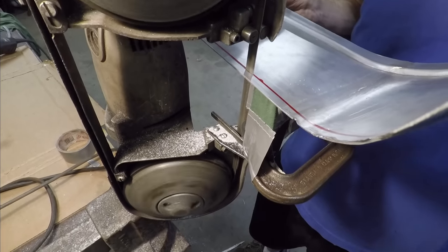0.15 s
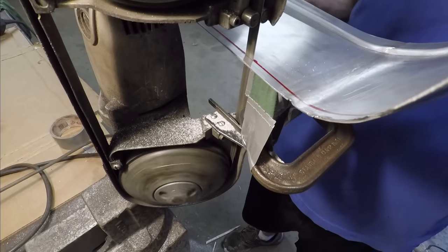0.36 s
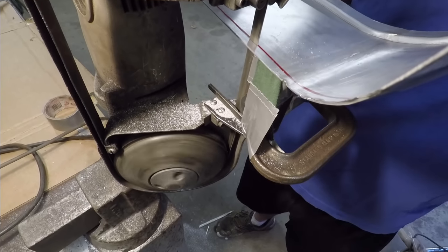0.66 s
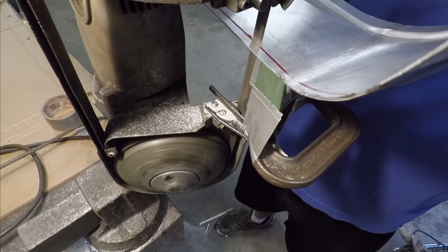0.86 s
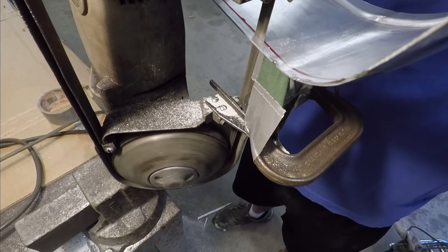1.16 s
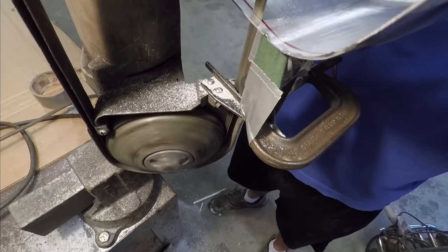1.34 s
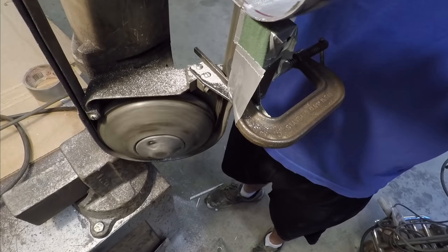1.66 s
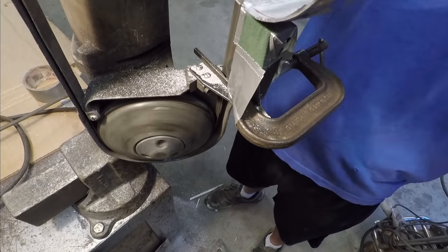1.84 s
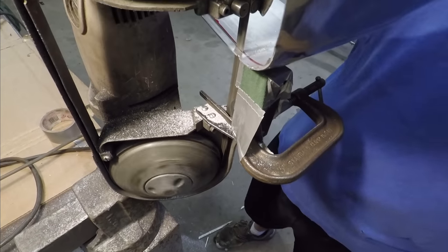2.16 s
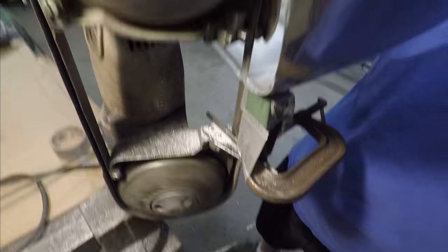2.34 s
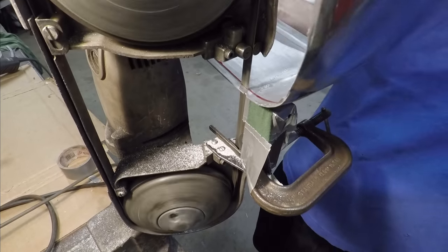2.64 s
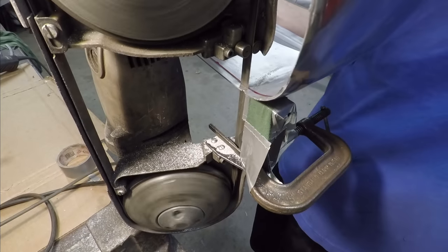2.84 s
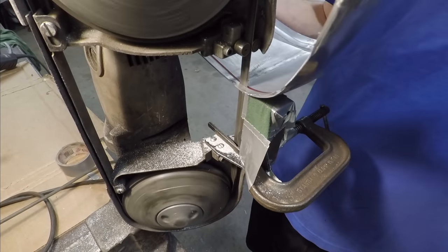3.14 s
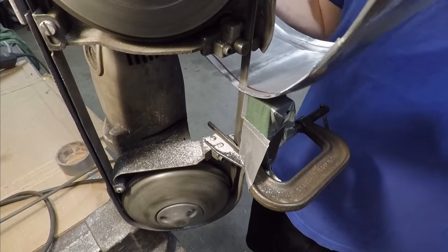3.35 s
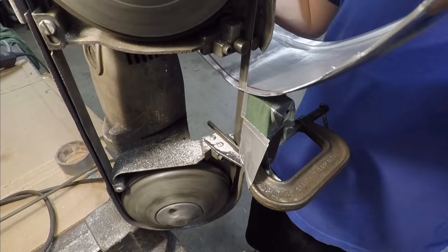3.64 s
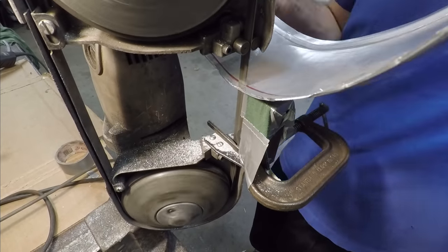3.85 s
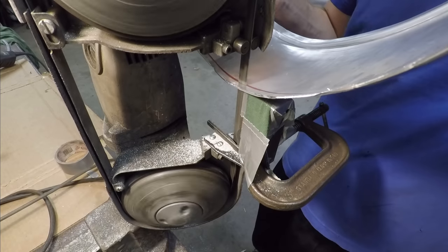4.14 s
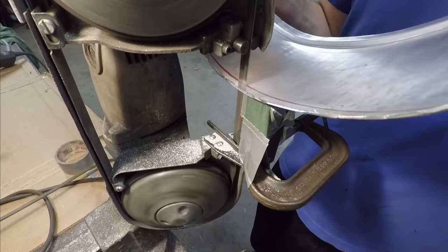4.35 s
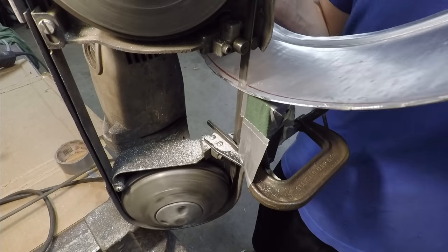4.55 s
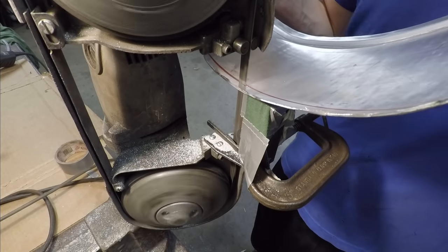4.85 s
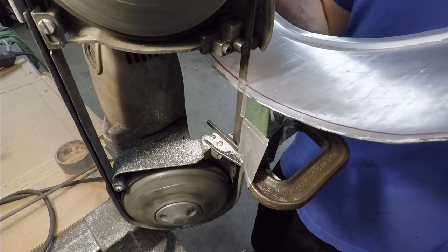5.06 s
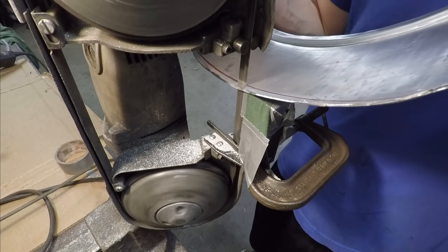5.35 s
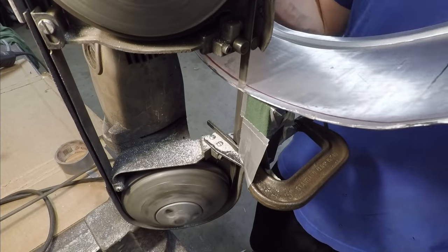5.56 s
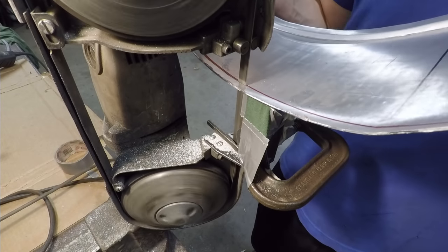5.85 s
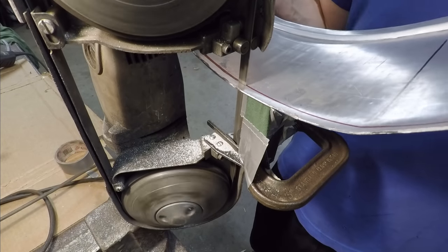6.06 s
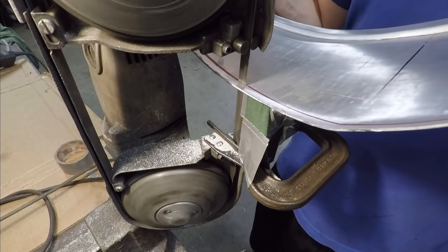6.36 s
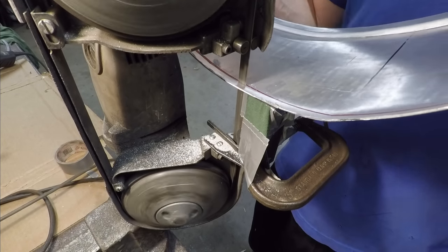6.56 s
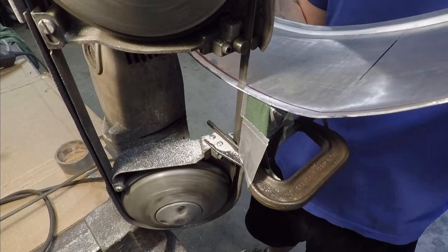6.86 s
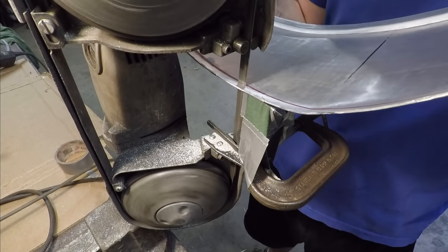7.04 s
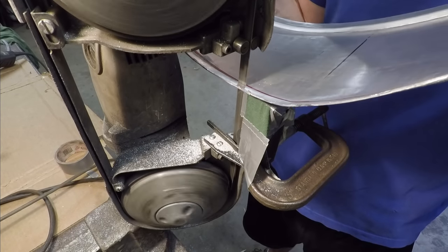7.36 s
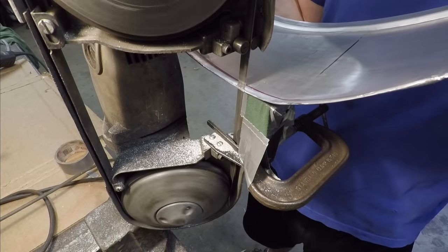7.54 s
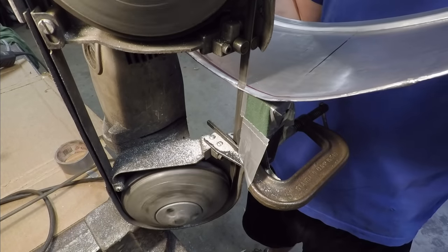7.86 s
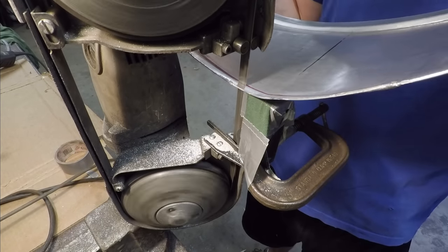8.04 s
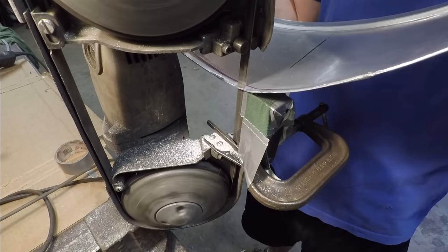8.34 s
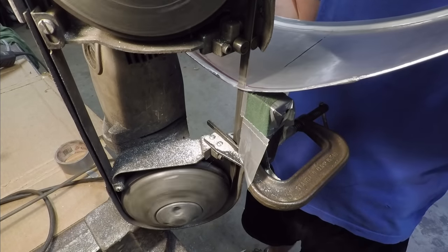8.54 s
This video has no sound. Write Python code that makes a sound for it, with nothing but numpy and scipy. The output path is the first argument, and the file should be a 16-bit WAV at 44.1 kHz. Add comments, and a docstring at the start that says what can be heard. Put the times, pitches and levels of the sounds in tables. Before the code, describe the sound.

A vertical band saw runs throughout, close to the microphone in a workshop. From 0 to about 1.4 s a curved metal sheet presses on the blade: full, rough mid-range buzz with brief ringing around 700 Hz, over hiss and a motor tone near 300 Hz with strong whines near 2.7 and 4.5 kHz. At 1.5-1.65 s the sheet lifts, the body thins, and dull low bumps hit the camera. More thuds come at 1.9-2.45 s, with a tiny choke in level at 1.95 s and short, high metallic chirps near 2.1 and 2.55 s. Around 2.6-2.8 s the narrow image opens into wide stereo with less rumble. From there to 8.6 s a steady, bright, airy hiss continues; the throbbing whine wavers slightly in pitch and shifts between centre and sides, with only faint passing sheet rings. It ends still running.

```python
"""In a workshop, a vertical band saw runs while a curved metal sheet is fed past the blade.
Sine waves tied to the shaft speed make the motor and gear whine; shaped noise makes the blade and guide hiss.
Noise ringing in narrow resonances makes the sheet buzz, mostly at first; short low swings are camera bumps.
The sound opens from one shared microphone to a wide left-right pair."""
import sys
import numpy as np
from scipy import signal
from scipy.io import wavfile
from scipy.ndimage import uniform_filter1d

SR = 44100
rng = np.random.default_rng(int(sys.argv[2]) if len(sys.argv) > 2 else 0)


def put_to_file(sound):
    """Save the sound as 16-bit audio at rate SR, in the file named by the first command-line argument."""
    columns = np.atleast_2d(sound).T  # one column per channel
    safe = np.clip(columns, -1, 1)
    whole_steps = np.round(safe * 32767)
    wavfile.write(sys.argv[1], SR, whole_steps.astype(np.int16))


def volts(x):
    """Linear amplitude factor 10**(x/20) for a level x in dB, scalar or array-like."""
    e = np.asarray(x, float) / 20
    return 10 ** e


N = 383669
T = np.arange(N) / SR  # time of every sample [s]
LIFT_S = (1.56, 1.58)  # the sheet is lifted: from, to [s]
PAIR_S = (2.637, 2.81)  # the shared microphone gives way to the pair: from, to [s]


def evened(x):
    """Scales to rms 1."""
    return x / np.sqrt(np.mean(x ** 2) + 1e-20)


def read(points, hz):
    """Reads a curve over frequency on a logarithmic axis."""
    f, value = np.transpose(points)
    return np.interp(np.log(hz + 1), np.log(f + 1), value)


def drift(t, top_hz, count, low_hz=0.1976):
    """Slow chance curves of rms 1, each the sum of 24 sines with random starts."""
    hz = np.geomspace(low_hz, top_hz, num=24)
    start = rng.random((count, 24, 1))
    coarse = np.arange(0, t[-1] + .01, .005)
    sines = np.sin(2 * np.pi * (hz[:, None] * coarse + start))
    sums = (sines / np.sqrt(hz[:, None])).sum(1)
    return np.array([np.interp(t, coarse, evened(s)) for s in sums])


def humps(t, rows, order=2):
    """Sum of bell-shaped swells (time, half length, height); a higher order gives steeper edges."""
    return sum(height * np.exp(-((t - s) / half) ** order) for s, half, height in rows)


def to_samples(t, curves):
    """Fills in slow curves sample by sample."""
    return np.array([np.interp(T, t, curve) for curve in curves])


def resonate(x, hz, width):
    """A resonance that follows the curve hz: shift down to zero, smooth, shift back up."""
    turn = np.exp(2j * np.pi * np.cumsum(hz) / SR)
    r = np.exp(-np.pi * width / SR)
    return 2 * (turn * signal.lfilter([1 - r], [1, -r], x / turn)).real


# the cut: (time [s], hiss level before the microphone trim [dB], how firmly the sheet rests on the blade [0-1])
CUT = [(0, -34, 1), (.31, -34, 0.77), (.58, -34, 0.94), (1.05, -32, 0.66), (1.49, -30.5, 0.3),
       (1.61, -31, 0.01), (1.9, -29.5, 0.02), (1.97, -33, 0.3), (2.09, -32.5, 0.15), (2.47, -30.5, 0.06),
       (2.64, -30.5, 0.08), (2.78, -32, 0), (3.72, -32, 0.04), (4.73, -32, 0.06), (5.1, -32, 0.04),
       (5.6, -31, 0), (6.5, -31.5, 0), (7.75, -31.5, 0), (7.97, -32.5, 0.14), (8.62, -32, 0.05)]
# rumble, body, middle and hiss over the hiss level [dB]: free on the shared microphone, free on the pair,
# and gained by full contact
FREE_DB = (-16, -7, -6, 0)
FREE_PAIR_DB = (-28, -13.5, -9, 0)
CONTACT_DB = (6, 10, 6.5, -1)
# the rumble swells or sinks: (time [s], half length [s], change [dB])
RUMBLE = [(1.9, 0.098, -1), (1.997, .05, 7), (2.448, .1, 3.5), (2.64, .08, -6), (2.85, 0.2, -8),
          (3.35, 0.3, -2), (5.05, 0.089, 5.5), (6.3, 0.36, 2), (7.7, .3, 3), (8.2, .25, 3), (8.68, .1, 8)]
# the topmost hiss comes and goes: (on [s], off [s], level before the microphone trim [dB])
TOP_ON = [(.4, 1.03, -58), (1.72, 1.96, -53.5), (2.11, 9, -56.5)]
# the topmost hiss sinks or swells: (time [s], half length [s], change [dB])
TOP_SINKS = [(.03, .18, -11), (.33, .07, 1), (1.09, .03, -4), (1.58, .06, -8), (2.03, .04, -1),
             (2.18, .08, -4), (2.45, .25, 3), (2.93, .1, -3), (3.3, 0.41, -4)]
TOP_REST_DB, TOP_RISE_S = -74, .07  # faint rest while the topmost hiss is off; length of its rise or fall


def band_levels(t):
    """The cut drives rumble, body, middle and hiss by different amounts; the topmost hiss comes and goes."""
    s, hiss_db, contact = np.transpose(CUT)
    wide = np.interp(t, PAIR_S, [0, 1])
    bands_db = np.interp(t, s, hiss_db) + np.outer(CONTACT_DB, np.interp(t, s, contact))
    bands_db += np.outer(FREE_DB, 1 - wide) + np.outer(FREE_PAIR_DB, wide)
    bands_db[0] += humps(t, RUMBLE)
    top_db = TOP_REST_DB + humps(t, TOP_SINKS)
    for on, off, db in TOP_ON:
        gate = np.clip(np.minimum(t - on, off - t) / TOP_RISE_S + .5, 0, 1)
        top_db = top_db + (db - TOP_REST_DB) * gate
    return [*bands_db, top_db]


# colour of the hiss before each band is levelled: (frequency [Hz], relative level per Hz [dB])
# with the sheet pressed on, with the sheet lifted, and as the pair hears it
PRESSED = [(15, -46), (25, -3), (258, -2.5), (441, 0), (577, 0), (1040, -5), (1190, -7.5), (1330, -3),
           (2660, -9.5), (2890, -11), (3210, -13.5), (3480, -7.5), (4440, -11), (7190, -11.5), (15200, -51)]
LIFTED = [(15, -50), (25, -15), (258, -9.5), (295, -6), (347, -16), (911, -7.5), (1290, -13.5), (1780, -7),
          (2270, -15), (3580, -7.5), (4200, -8.5), (4560, -11), (5350, -11.5), (9150, -17.5), (15200, -92)]
PAIR = [(15, -53), (25, -8), (104, -0.5), (258, -0.5), (295, 0.5), (329, -15.5), (887, -6), (1220, -7),
        (2660, -8), (4200, -7), (4560, -10), (4940, -11.5), (5800, -5.5), (7850, -7.5), (8000, -11),
        (9400, -13.5), (15200, -52)]
# balance of the pair's hiss before levelling: (frequency [Hz], left minus right [dB])
LEFT_LEAD = [(60, 9.5), (92, 6.5), (140, -6), (210, 10), (330, 4), (500, 6), (760, 3), (1160, -3),
             (1780, 2), (2720, 0), (4150, -3), (6340, 4.5), (9680, -1), (14800, -1.5)]
# resonances of frame, wheels and guards:
# (frequency [Hz], width [Hz], mean level over the hiss when shared [dB], at the left [dB], at the right [dB])
FRAME = [(110, 50, 0, 6, 7), (780, 50, -3, 4, 6), (890, 140, 3, 5, 3), (2260, 100, 2, 3, -3),
         (2430, 50, 0, 4, 1), (3290, 90, -4, 2, 3), (4870, 60, 4, 2, 2), (5320, 70, -2, 3, -1),
         (5670, 50, 1, 5, 1), (5800, 45, 2, 5, 2), (6040, 70, 2, 2, 1), (6340, 45, 1, 8, 2),
         (7180, 200, 2, 2, -1), (8060, 100, 5, 1, 2), (8340, 100, 2, 1, 1), (9360, 70, 3, 4, 0),
         (9600, 80, 3, -2, 6), (10600, 200, 2, -1, 3)]
# rumble, body, middle, hiss and topmost hiss: (from [Hz], to [Hz])
BANDS_HZ = [(30, 250), (350, 1300), (1500, 2600), (2800, 10500), (11400, 15000)]
TOP_HZ, TOP_FALL_DB = 11350, 1.5  # above here the hiss is nearly flat: dB lost per kHz


def hiss():
    """Blade and guide noise coloured by the frame; rows are the shared, left and right microphone."""
    frames, hz = N // 512 + 5, np.fft.rfftfreq(2048, 1 / SR)
    t = np.arange(frames) * 512 / SR
    real, imaginary, patches, scrapes = rng.standard_normal((4, 3, 1025, frames))
    patches = evened(uniform_filter1d(uniform_filter1d(patches, 16, 1), 8, 2))
    scrapes = evened(uniform_filter1d(uniform_filter1d(scrapes, 2, 1), 14, 2))  # narrow, short rings

    lifted = np.interp(t, LIFT_S, [0, 1])
    shared_db = np.outer(read(PRESSED, hz), 1 - lifted) + np.outer(read(LIFTED, hz), lifted)
    lead = read(LEFT_LEAD, hz) / 2
    left_db, right_db = (np.outer(read(PAIR, hz) + k * lead, t ** 0) for k in (1, -1))
    power = volts(2 * np.array([shared_db, left_db, right_db]))
    top = hz > TOP_HZ
    fall_db = TOP_FALL_DB * (hz[top, None] - TOP_HZ) / 1000
    power[:, top] = power[:, ~top][:, -1:] * volts(-2 * fall_db)

    # each frame resonance comes and goes
    f, width, *over_db = np.transpose(FRAME)
    chance = drift(t, 8, count=3 * len(f)).reshape(3, len(f), -1)
    swing_db = np.array([1.2, 2, 2])[:, None, None] * chance
    swells = volts(np.array(over_db)[..., None] + swing_db) ** 2
    power *= 1 + 1 / (1 + (2 * (hz[:, None] - f) / width) ** 2) @ swells

    field_db = 1.2 * patches + 7 * np.clip(scrapes - 1.1, 0, 1.5)
    field_db += .9 * drift(t, 20, count=3)[:, None]
    # bring each band to its level
    for k, (db, (lo, hi)) in enumerate(zip(band_levels(t), BANDS_HZ)):
        share = read([(f, j == k) for j, edges in enumerate(BANDS_HZ) for f in edges], hz)
        own = uniform_filter1d(power[:, (hz > lo) & (hz < hi)].sum(1), 10, 1)
        own[1:] = uniform_filter1d(own[1:].mean(0), 200)  # the pair keeps its balance
        field_db += share[:, None] * (db - 10 * np.log10(own))[:, None]
    # raise the pair's lowest rumble by 3 dB; it stays fainter than on the shared microphone
    field_db[1:, hz < 220] += 3
    z = (real + 1j * imaginary) * np.sqrt(power) * volts(field_db)
    trim = volts([[-.5], [2.5], [2.5]])  # microphone trim
    return trim * signal.istft(z, nperseg=2048, noverlap=1536)[1][:, :N]


# bumps on the camera body: (time [s], peak level [dB], frequency [Hz], ring time [ms])
BUMPS = [(1.518, -24, 120.5, 10), (1.531, -17.5, 160.5, 6.5), (1.564, -28, 50.2, 20), (1.585, -29, 70, 6),
         (1.613, -33, 90, 8), (1.646, -33, 118, 8), (1.89, -21, 150, 2.4), (1.941, -21, 90, 9),
         (1.952, -27, 45, 12), (2.001, -28, 59.46, 7), (2.07, -31, 120.3, 11), (2.192, -25.5, 119, 8.3),
         (2.33, -26.5, 52, 18), (2.341, -29, 90, 9), (2.36, -25, 105, 6), (2.383, -31, 80, 12),
         (2.434, -34, 101.7, 10.8)]


def bumps():
    """Each bump is a low swing of the camera body that quickly dies away."""
    out, t = np.zeros(N), T[:SR // 5]
    for s, db, hz, ring_ms in BUMPS:
        swing = -np.sin(2 * np.pi * hz * t + 0.96) * np.exp(-1000 * t / ring_ms)
        swing = swing * np.minimum(t / 0.00093, 1)  # soft start
        out[round(s * SR):][:len(t)] += volts(db) * swing / abs(swing).max()
    return out


# the sheet sings as it touches the blade:
# (start [s], length [s], frequency [Hz], level before the soft ends and the pair's lift [dB], left minus right [dB])
SHEET = [(0, 0.13, 725, -36, 0), (0.14, 0.35, 735, -30.5, 0), (0.52, 0.14, 730, -33, 0),
         (0.65, .3, 735, -42, 0), (0.08, 0.16, 785, -36, 0), (1.075, 0.1, 775, -35, 0),
         (0.545, 0.12, 510, -37, 0), (.5, 0.09, 260, -42, 0), (0.84, 0.2, 445, -36, 0),
         (1.15, 0.117, 398, -39, 0), (0.75, 0.12, 500, -41, 0), (0.42, 0.255, 1050, -39, 0),
         (0.7, 0.3, 1040, -35, 0), (0.42, 0.07, 1447, -38, 0), (.485, .05, 1400, -34, 0),
         (0.65, .14, 1460, -37.5, 0), (0.78, 0.34, 1303, -39, 0), (0.99, 0.343, 3220, -39.5, 0),
         (1.43, .2, 3080, -40, 0), (1.66, .3, 3100, -44, 0), (0.7, 0.68, 2320, -41.5, 0),
         (0.9, 0.6, 2150, -41, 0), (2.13, 0.44, 3600, -41, 0), (2.05, .06, 3450, -40, 0),
         (2.103, .028, 3740, -30, 0), (2.07, .03, 4000, -37, 0), (2.55, 0.05, 3680, -33, 0),
         (2.6, .1, 3660, -44, 0), (6.42, 0.2, 3650, -42, -3), (6.25, .17, 1770, -43.5, 0),
         (6.46, .2, 1670, -46, 0), (6.06, .12, 1900, -47, 0), (4.52, 0.058, 7900, -41, 0),
         (7.0, 0.05, 3010, -42, 0), (2.07, .12, 1615, -41, 0), (2.89, 0.2, 2365, -43, 9),
         (3.08, 0.2, 7480, -40, 0), (3.18, .22, 7150, -41, 0), (3.63, 0.196, 7200, -45, -7),
         (4.13, .27, 2350, -46, 4), (4.05, 0.25, 1585, -46.5, -2), (4.89, 0.5, 3285, -48, -4),
         (5.4, 0.27, 2335, -46, -5), (6.28, 0.297, 3240, -44.5, -3), (5.43, .15, 1570, -47, 0),
         (5.32, 0.31, 2000, -53, -3), (7.12, .2, 3635, -46, -3), (7.45, 0.25, 2310, -42, 5),
         (8.33, .3, 3580, -47, 0), (7.75, 0.4, 2220, -47.5, 9), (7.73, .4, 3145, -46, -1),
         (7.1, .2, 1570, -49, 0), (6.76, .35, 2270, -48, 0)]
SAG_PER_S, WAVER = .02, .004  # share of the pitch lost in a second, share by which it wanders
MODE_WIDTH = 18  # width of a mode at 1 kHz [Hz]
SOFT_ENDS, STEADY = 0.4, .5  # share of a touch spent rising and fading, share of chance swelling held back


def sheet():
    """Noise from the teeth rings one bending mode of the sheet for a moment; the cut steadies the ring."""
    out = np.zeros((3, N))
    noise = rng.standard_normal((len(SHEET), 3, SR))
    noise[:, 1:] += noise[:, :1]  # both sides of the pair hear much the same ring
    wavers = drift(T[:SR:100], 12, count=len(SHEET), low_hz=2)
    for (s, length, start_hz, db, pan_db), teeth, waver in zip(SHEET, noise, wavers):
        t = T[:round(length * SR)]
        wander = WAVER * np.interp(t, T[:SR:100], waver)
        hz = start_hz * (1 - SAG_PER_S * (t - length / 2) + wander)
        width = MODE_WIDTH * np.sqrt(start_hz / 1000)
        fade = signal.windows.tukey(len(t), SOFT_ENDS)
        for row, side, drive in zip(out, (0, .5, -.5), teeth):
            ring = evened(resonate(drive[:len(t)], hz, width))
            swelling = abs(uniform_filter1d(ring ** 2, size=600)) + .05
            ring = evened(ring / swelling ** (STEADY / 2))
            row[round(max(s, 0) * SR):][:len(t)] += volts(db + side * pan_db) * ring * fade
    return out * volts([[0], [.8], [.8]])  # a slight lift for the pair


# motor speed hunting under load: (time [s], shaft speed [Hz])
SPEED = [(0, 302.6), (0.29, 298.9), (0.52, 301.2), (1.29, 297.6), (1.45, 301.6), (1.57, 297.8),
         (1.72, 301.8), (1.99, 301), (2.09, 297.7), (2.37, 297), (2.53, 297.7), (2.79, 304.8), (2.97, 297),
         (3.05, 300), (3.42, 297.7), (3.61, 300.2), (3.76, 296.8), (3.87, 299.6), (3.97, 298.5),
         (4.1, 301.5), (4.28, 297), (4.59, 302.6), (4.7, 299), (4.85, 300.3), (5.0, 296.2), (5.05, 295.4),
         (5.16, 300.6), (5.3, 302.3), (5.44, 297), (5.64, 301.2), (5.8, 299.5), (5.91, 300.6), (6.04, 298),
         (6.44, 298.5), (6.76, 302.2), (6.94, 297.7), (7.91, 298.9), (8.65, 296.2)]
# the loud shaft orders: (multiple of shaft speed, phase jitter [rad], throb depth [0-1], mean level
# with the sheet pressed on [dB], lifted [dB], at the left of the pair [dB], at the right [dB])
LOUD_ORDERS = [(1, 0.63, .08, -47.5, -50, -60.5, -61), (9, 0.45, .28, -40.5, -43.5, -42, -40),
               (15, 0.78, .08, -47, -34, -40, -39)]
# a whine swells or fades for a moment: (time [s], half length [s], multiple, left [dB], right [dB])
FADES = [(0.151, 0.46, 1, 7, 5), (1.603, .06, 1, -13, -8), (2.95, 0.2, 1, -13, -4), (7.8, 0.42, 1, 7, 6.5),
         (.1, 0.23, 9, -2, -2), (.58, .13, 9, 2.5, 3.5), (1.34, 0.088, 9, 3, 4), (1.86, .04, 9, 4, 4),
         (3.66, .1, 9, 4, 3), (1.6, .04, 9, -8, -8), (2.06, 0.13, 9, -4, -5), (2.22, .04, 9, 5, 2),
         (2.36, .07, 9, -12, -12), (2.6, 0.062, 9, -14, -10), (3.0, 0.36, 9, -4.5, -3.5),
         (5.0, 0.073, 9, 1, -13), (7.2, 0.87, 9, -3, 2.5), (.05, .1, 15, 6, 5), (.45, .06, 15, -5, -5),
         (0.752, .06, 15, -6, -5), (1.15, .25, 15, 2, 2), (1.949, 0.13, 15, -11, -9),
         (2.43, 0.036, 15, -25, -18), (2.796, 0.11, 15, -14, -5), (7.25, 0.29, 15, -12, -14),
         (6.45, .15, 15, -3, -3), (8.64, .12, 15, -4, -9), (8.37, .08, 15, 2, 2)]
# a whine slips from the centre of the pair out to the sides:
# (time [s], half length [s], multiple, phase between left and right [rad])
SPREADS = [(2.95, .3, 1, 2.8), (4.699, 0.39, 1, 2.47), (6.099, 0.19, 1, 2.53), (6.949, 0.17, 1, 1.9),
           (8.6, 0.097, 1, 1.38), (3.36, .145, 9, 2.8), (4.14, 0.026, 9, 2.6), (4.406, .02, 9, 2.2),
           (4.59, 0.045, 9, 3), (4.779, 0.061, 9, 2.95), (5.02, 0.12, 9, 2.3), (5.381, 0.041, 9, 3),
           (5.26, .09, 9, 1.8), (5.53, .08, 9, 2.5), (5.719, 0.026, 9, 1.96), (6.0, .03, 9, 2.2),
           (6.1, .02, 9, 1.94), (7.22, .03, 9, 1.8), (7.55, .025, 9, 1.8), (6.29, 0.05, 9, 3),
           (6.41, .04, 9, 2.2), (6.52, 0.07, 9, 2.9), (6.95, 0.14, 9, 2.2), (8.04, .07, 9, 2.8),
           (8.34, .035, 9, 2.8), (8.62, 0.21, 9, 2.9), (4.0, 0.59, 15, 1.4), (4.32, .08, 15, 1.1),
           (4.659, 0.097, 15, 2.54), (4.82, .08, 15, 2.2), (5.07, 0.11, 15, 2.9), (5.33, 0.135, 15, 2.6),
           (6.34, .06, 15, .6), (6.45, 0.17, 15, 2.3), (6.98, .16, 15, 2.4), (7.75, 0.2, 15, 1.9),
           (8.02, .07, 15, 2), (8.17, 0.09, 15, 2.4), (8.62, 0.185, 15, 2.9)]
# fainter shaft orders, before fading and damping:
# (multiple of shaft speed, level on the shared microphone [dB], level on the pair's centre and sides [dB])
ORDERS_DB = [(3, -60, -61), (12, -57, -54), (27, -54, -61), (30, -55, -60), (31.4, -55, -62),
             (32.2, -57, -63), (35.35, -62, -65), (45, -81, -86)]
# multiples of the gear mesh, before fading: (multiple of the mesh rate,
# level on the shared microphone with the sheet pressed on [dB], level on the pair's centre and sides [dB])
MESH_DB = [(2, -47, -69), (4, -52, -70), (5, -52, -67), (6, -55, -57), (8, -52, -60), (9, -54, -55)]
# the gear mesh rate as a share of shaft speed
MESH = .8745
# an uneven gear wheel makes the loud whines throb once a turn; the share is for the shared microphone
THROB_HZ, THROB_RAD, THROB_SHARED = 17.8, 1.8, .5
FLUTTER_DB, WANDER_RAD = 1.5, .22  # quick level flutter; wobble of a whine's left-right phase (both rms)
DAMP_DB = 7  # the highest whines sink by this on the shared microphone under full contact


def whine():
    """Shaft and gear tones follow the motor speed; rows are the shared microphone, the pair's centre and sides."""
    angle = 2 * np.pi * np.cumsum(np.interp(T, *np.transpose(SPEED))) / SR
    out, t = np.zeros((3, N)), T[::100]
    pressed = np.interp(t, LIFT_S, [1, 0])  # the sheet radiates the gear tones while it touches
    contact = np.interp(t, *np.transpose(CUT)[::2])
    throb = np.outer([THROB_SHARED, 1, 1], np.cos(2 * np.pi * THROB_HZ * t + THROB_RAD))

    for order, rough, depth, pressed_db, lifted_db, left_db, right_db in LOUD_ORDERS:
        jitter, wobble, *flutter = drift(t, 40, count=4, low_hz=4)
        spreads = [(s, half, rad) for s, half, k, rad in SPREADS if k == order]
        lead = humps(t, spreads, order=4) + WANDER_RAD * wobble
        fades = [row for row in FADES if row[2] == order]
        left, right = (humps(t, [(row[0], row[1], row[k]) for row in fades]) + FLUTTER_DB * chance
                       for k, chance in zip((3, 4), flutter))
        shared_db = lifted_db + (pressed_db - lifted_db) * pressed
        gains = volts(np.array([shared_db + left, left_db + left, right_db + right])) * (1 + depth * throb)
        phase = rough * jitter + np.outer([0, .5, -.5], lead)
        turns = order * angle + to_samples(t, phase)
        shared, left, right = np.sqrt(2) * to_samples(t, gains) * np.cos(turns)
        out += [shared, (left + right) / 2, (left - right) / 2]

    for order, shared_db, pair_db in ORDERS_DB + [(k * MESH, a, b) for k, a, b in MESH_DB]:
        jitter, fade = drift(t, 60, count=6, low_hz=.7).reshape(2, 3, -1)
        level_db = pair_db + 4 * fade
        level_db[0] += (shared_db - pair_db) * (1 if order > 10 else .3 + .7 * pressed)
        level_db[0] -= DAMP_DB * contact * (order > 20)
        turns = order * angle + 2.2 * to_samples(t, jitter)
        out += np.sqrt(2) * to_samples(t, volts(level_db)) * np.cos(turns)
    return out


# early bands where the right side is turned against the left, before wavering and widening:
# (middle at the start [Hz], width [Hz], until [s], turn [rad], climb [Hz per s])
TURNED = [(1680, 930, .59, np.pi, 230), (3400, 950, .95, 2.2, -60), (5600, 750, .49, 1.6, 550),
          (8200, 900, .25, 1.9, 700), (9350, 600, .23, 1.4, 0)]
# the turn goes further in the upper part of a band for a moment: (time [s], half length [s], extra share)
OVERSHOOT = [(.2, .045, .28), (.29, .025, .28)]
# the first band reaches up: (time [s], half length [s], rise of its middle and growth of its half width [Hz])
WIDENING = [(.12, .04, 50), (.35, .045, 110)]


def turned(x):
    """Turns the phase inside a few wavering bands that narrow and close."""
    hz, t, z = signal.stft(x, SR, nperseg=1024, noverlap=768)
    turn = np.zeros(z.shape)
    for (f, width, until, radians, climb), wander in zip(TURNED, drift(t, 8.2, count=len(TURNED))):
        reach = humps(t, WIDENING) * (f == TURNED[0][0])
        closing = np.clip(1 - t / until, 0, 1) ** 0.2
        half = width / 2 * closing * (1 + 0.05 * wander) + reach
        middle = f + climb * t + reach + 15 * drift(t, 11.7, count=1, low_hz=2.2)[0]
        past = 1 + humps(t, OVERSHOOT) * np.clip((hz[:, None] - f + 10) / 150, 0, 1)
        turn += radians * past * np.clip((half - abs(hz[:, None] - middle)) / 240, 0, 1)
    return signal.istft(z * np.exp(1j * turn), nperseg=1024, noverlap=768)[1][:N]


def scene():
    """Mixes all sources; the shared microphone hands over to the pair in an even-power crossfade."""
    tone, centre, sides = whine()
    noise = hiss() + sheet()
    shared = noise[0] + tone + bumps()
    pair = noise[1:] + [centre + sides, centre - sides]
    wide = np.interp(T, PAIR_S, [0, np.pi / 2])
    return np.cos(wide) * np.array([shared, turned(shared)]) + np.sin(wide) * pair


def low_pass(x):
    """Removes everything above the highest recorded frequency."""
    return signal.sosfilt(signal.butter(12, 15390, fs=SR, output="sos"), x)


CHOKE_S, CHOKE_DB, CHOKE_HALF_S = 1.952, 10.6, 0.0063  # the whole sound chokes: time, depth, half length
BLOCK_HZ, BLOCK_DEPTH = 187.5, .07  # rate and depth of the flutter


def record(dry):
    """Gain control dips on loud lows, one brief choke, and a faint flutter from block-wise processing."""
    low = signal.sosfilt(signal.butter(2, 300, fs=SR, output="sos"), dry.mean(0))
    power_db = 10 * np.log10(abs(uniform_filter1d(low ** 2, 200)) + 1e-12)
    fall = T * 200  # the held peak falls by this many dB a second
    held_db = np.maximum.accumulate(power_db + fall) - fall
    over_db = np.maximum(held_db + 24.0, 0)  # acts above -24 dB
    choke_db = CHOKE_DB * np.exp(-((T - CHOKE_S) / CHOKE_HALF_S) ** 2)
    steady = dry / volts(.5 * uniform_filter1d(over_db, 100) + choke_db)
    mix = steady * (1 + BLOCK_DEPTH * np.cos(2 * np.pi * BLOCK_HZ * T))
    return low_pass(mix)


dry = scene()
out = record(dry)
put_to_file(out)
```